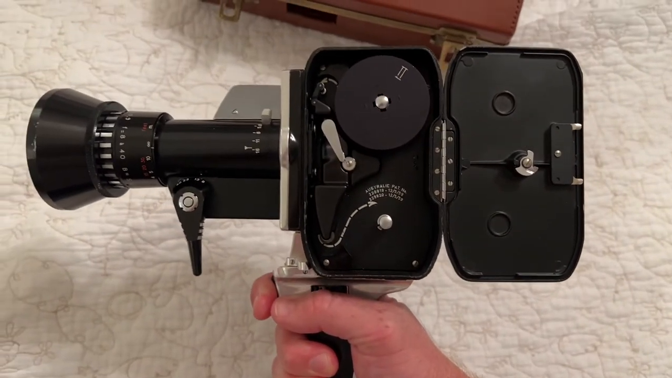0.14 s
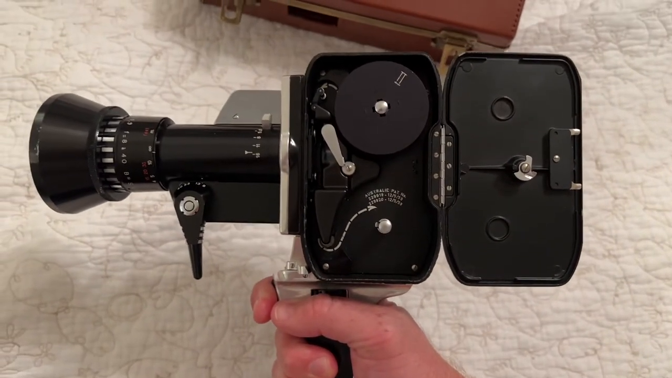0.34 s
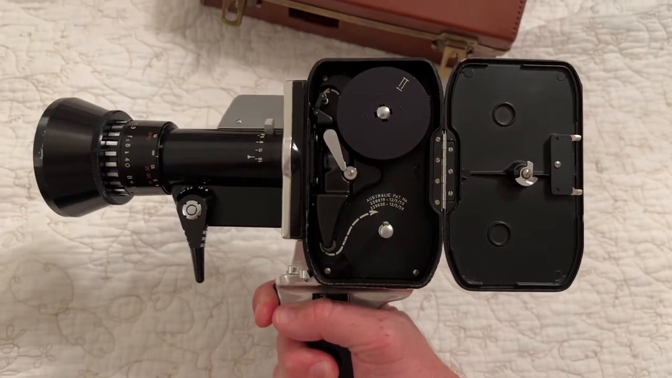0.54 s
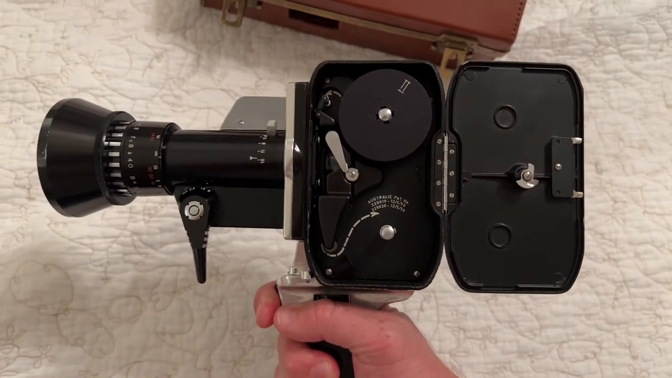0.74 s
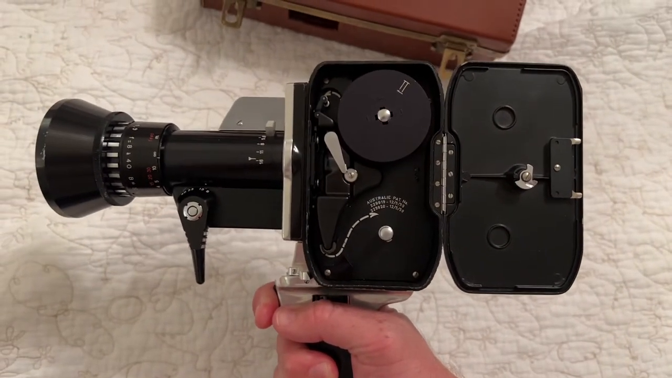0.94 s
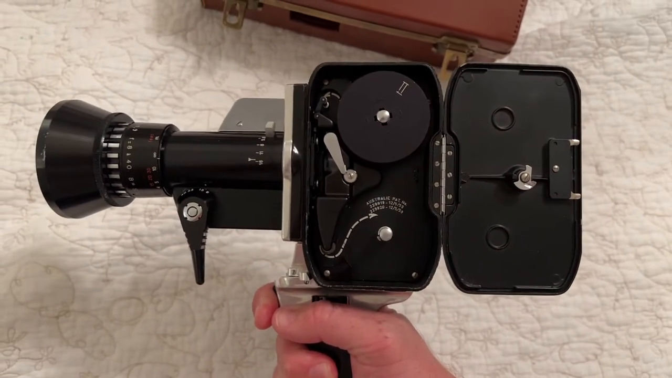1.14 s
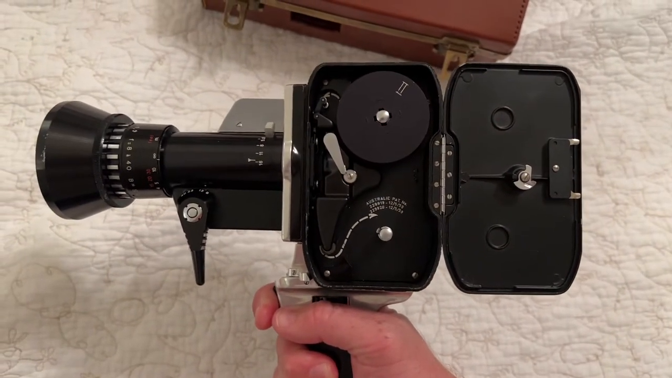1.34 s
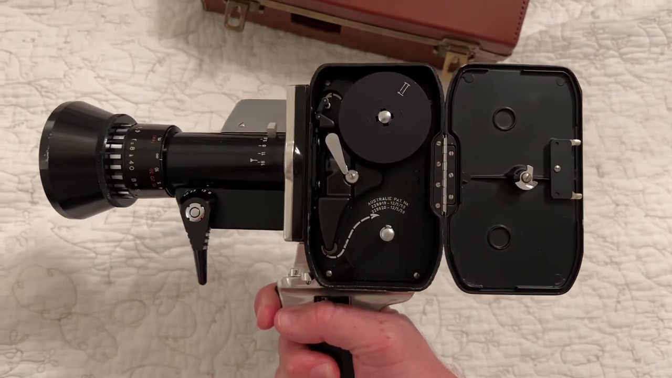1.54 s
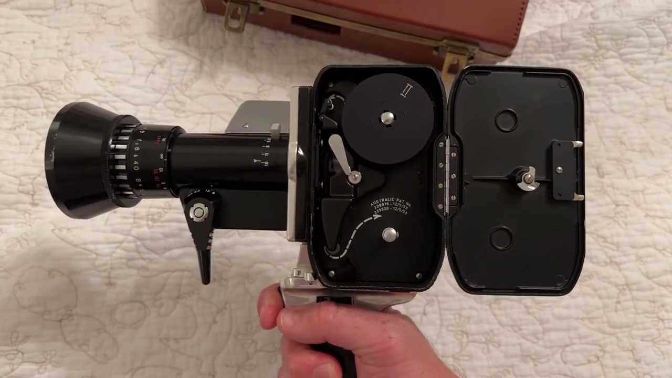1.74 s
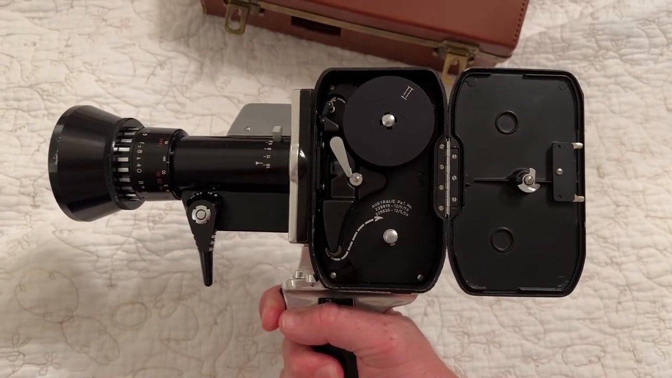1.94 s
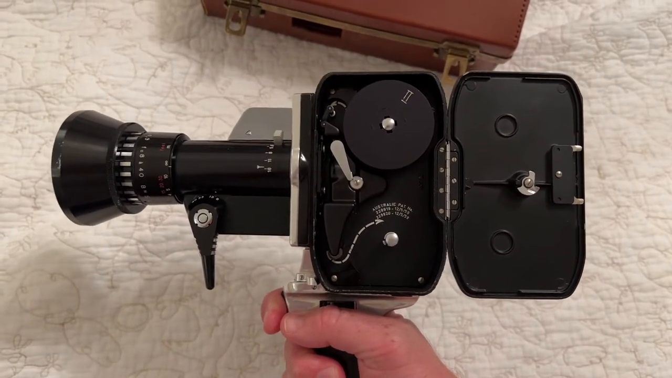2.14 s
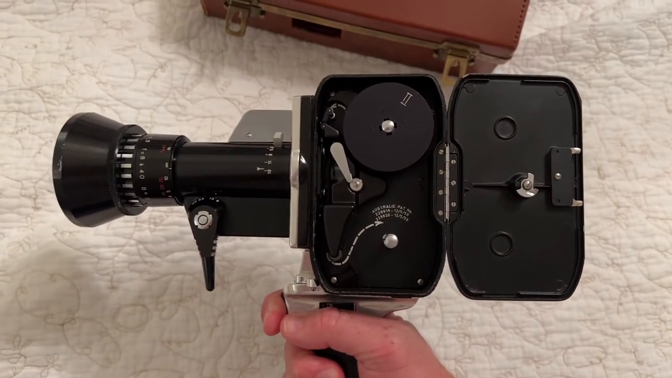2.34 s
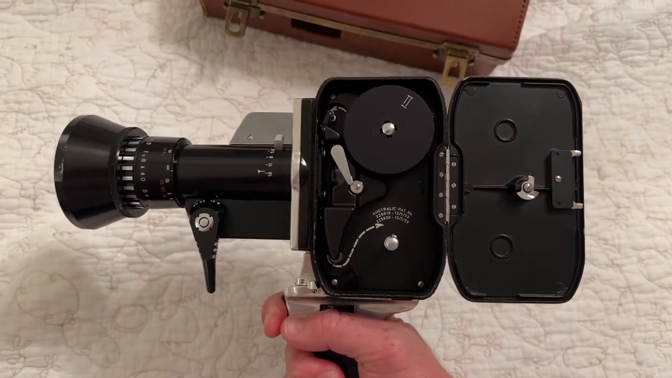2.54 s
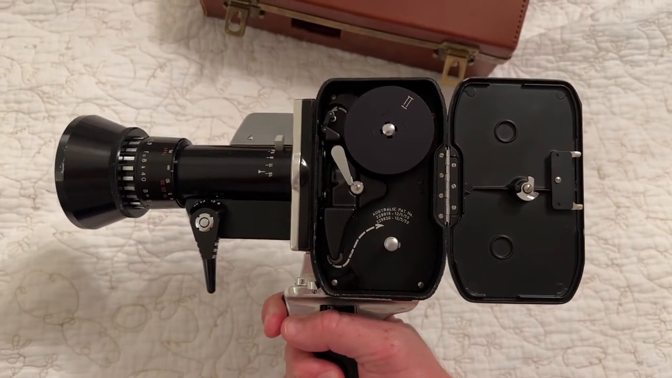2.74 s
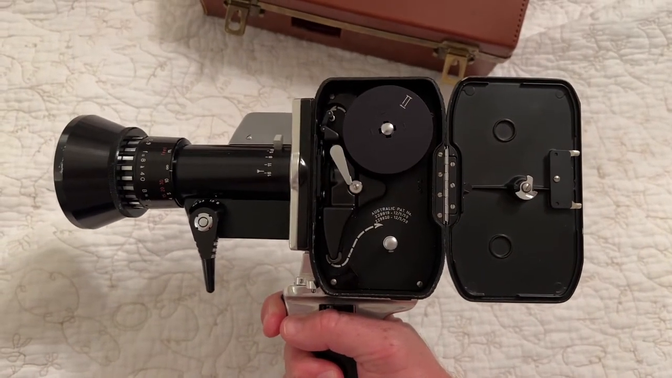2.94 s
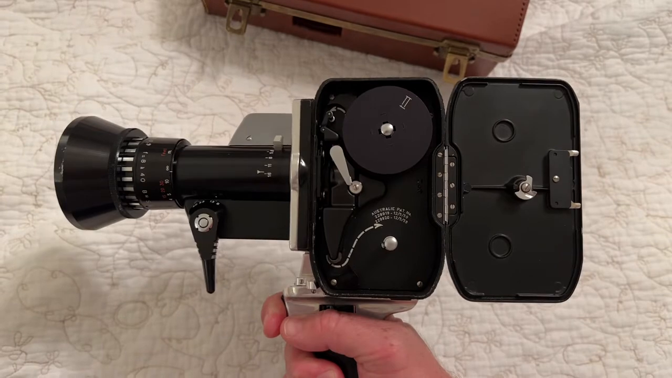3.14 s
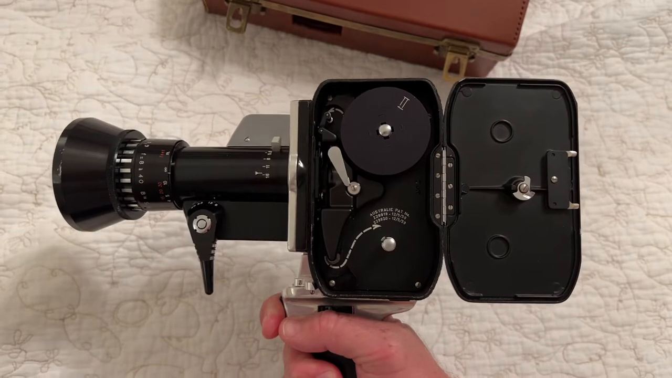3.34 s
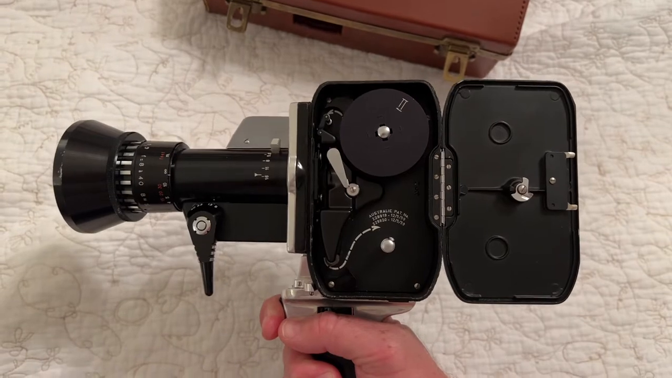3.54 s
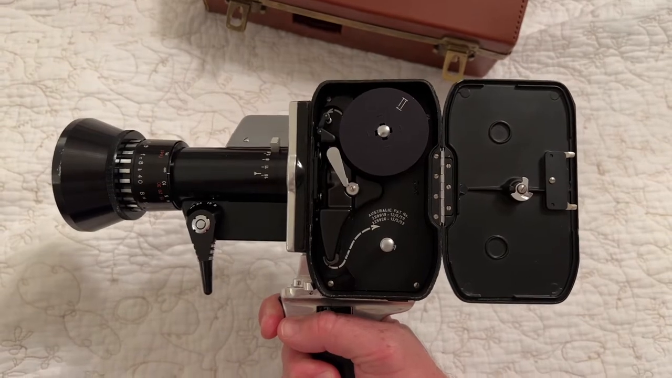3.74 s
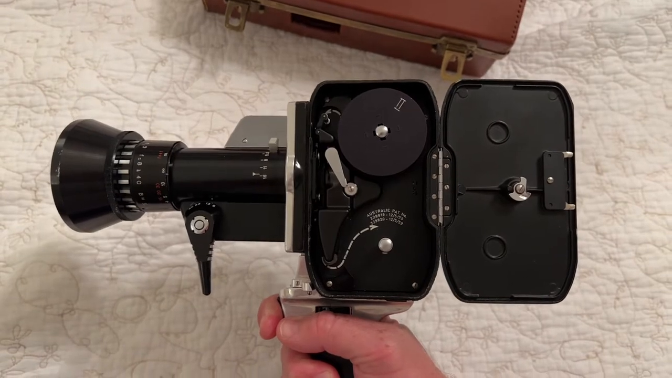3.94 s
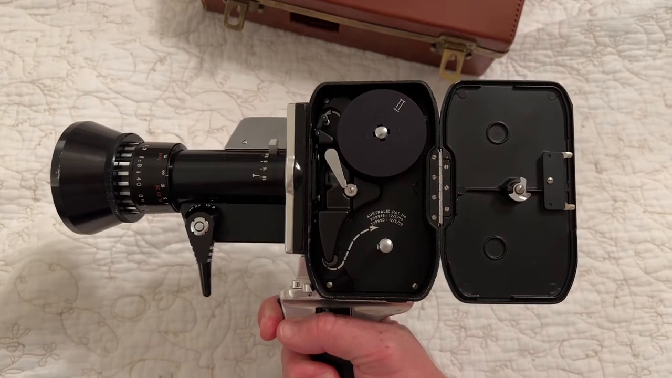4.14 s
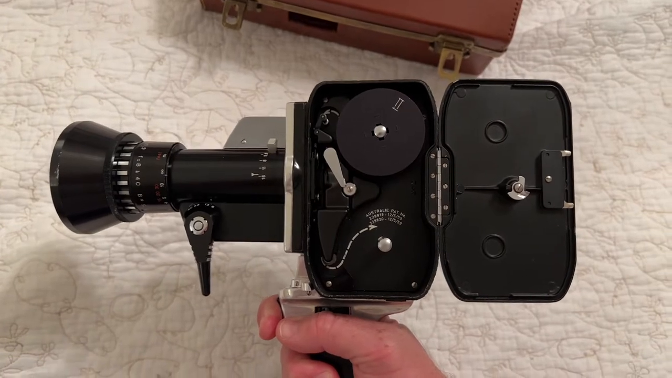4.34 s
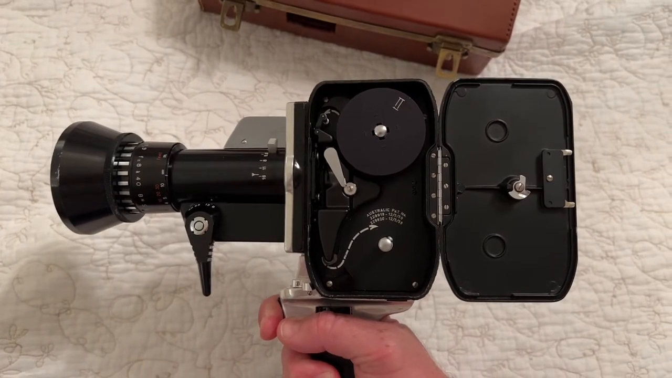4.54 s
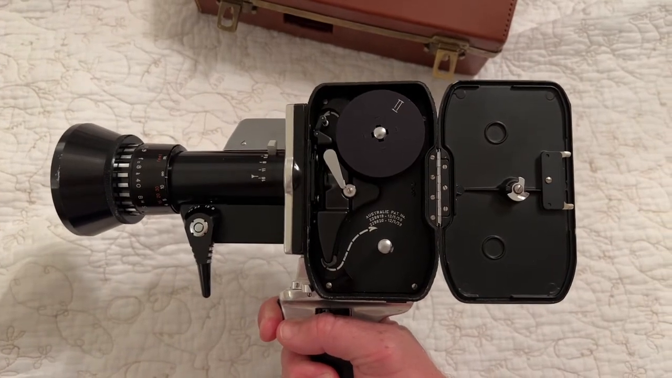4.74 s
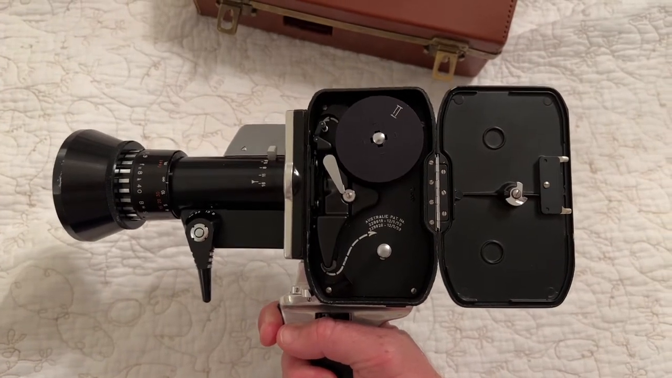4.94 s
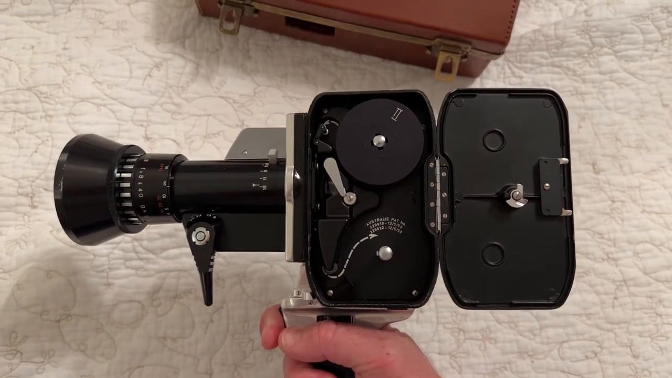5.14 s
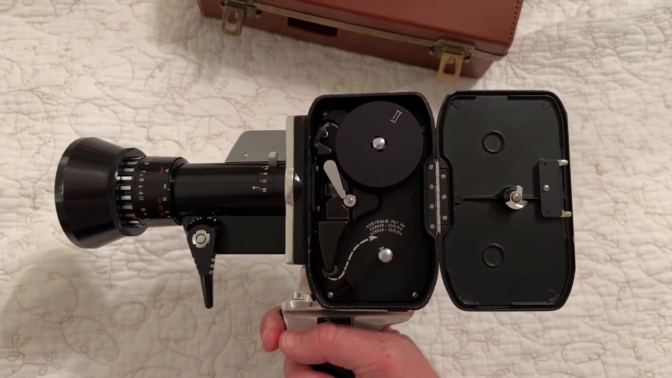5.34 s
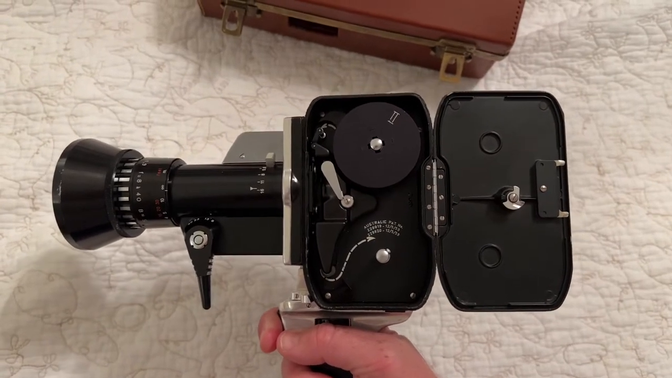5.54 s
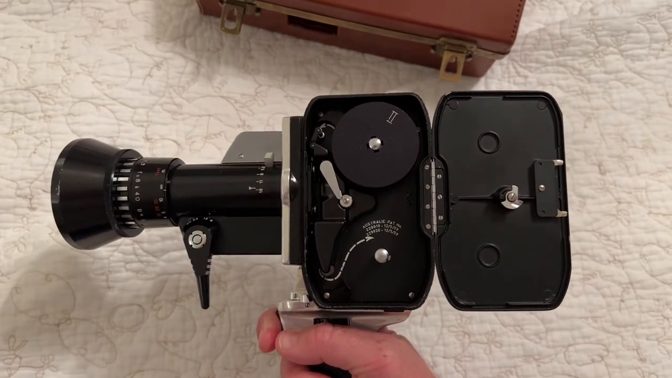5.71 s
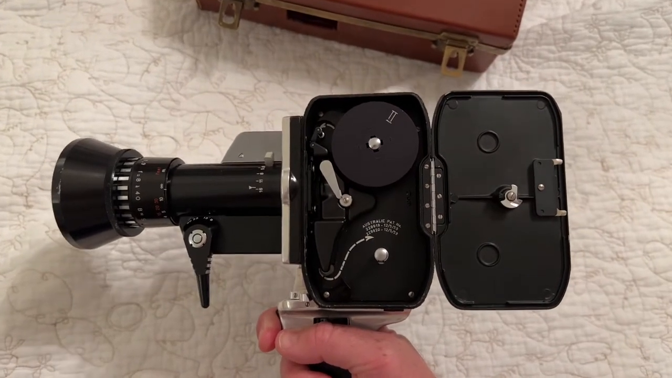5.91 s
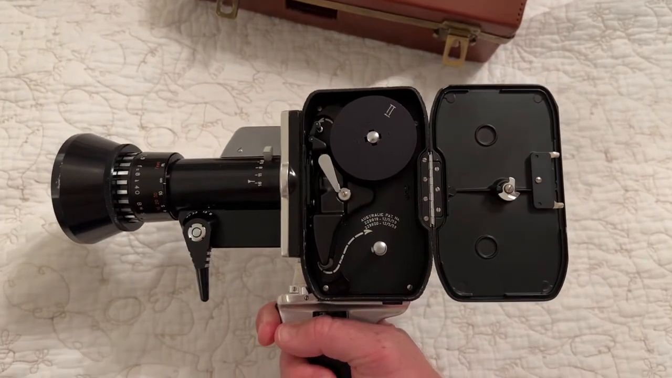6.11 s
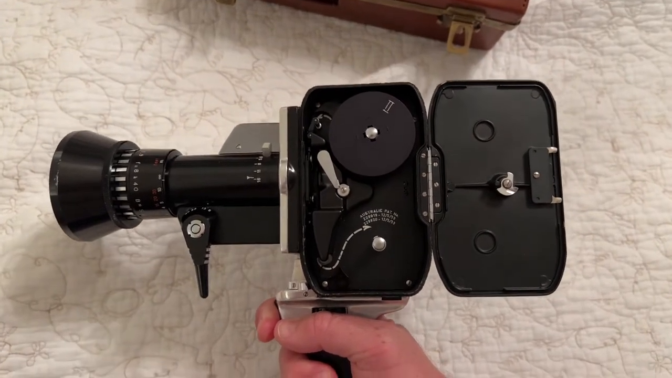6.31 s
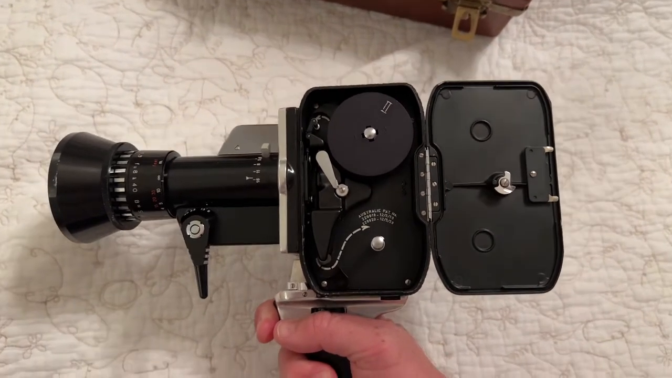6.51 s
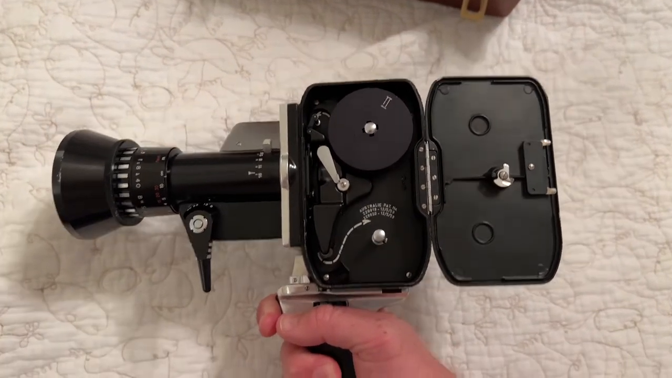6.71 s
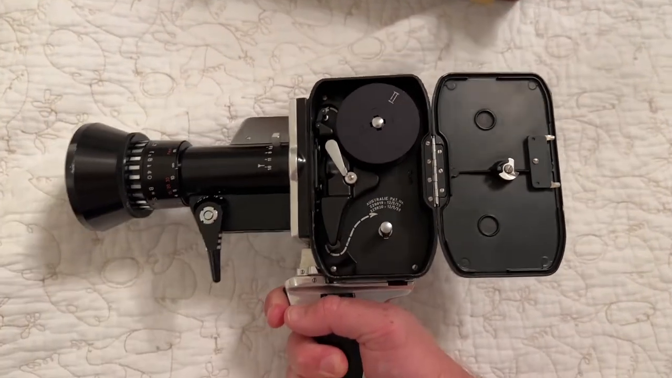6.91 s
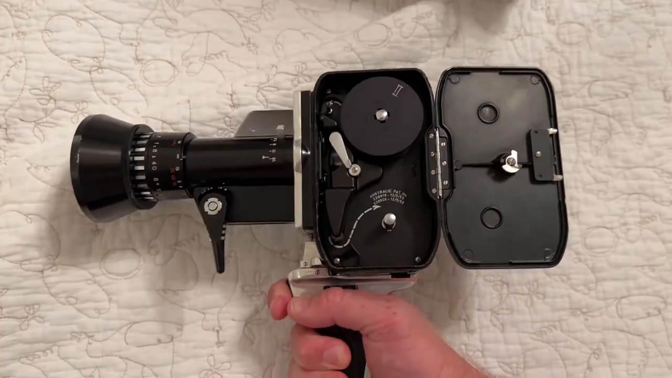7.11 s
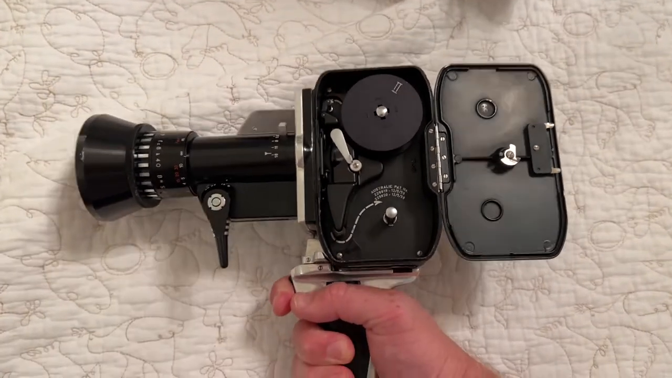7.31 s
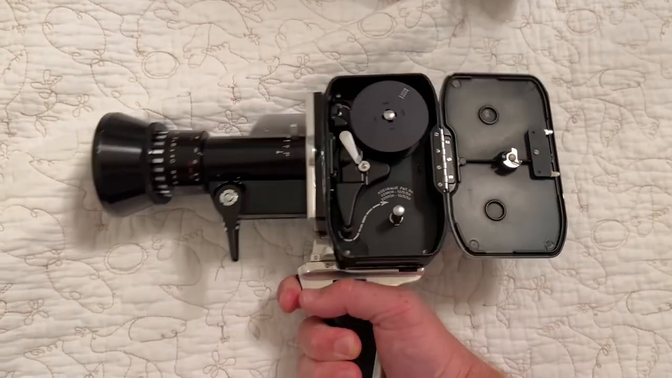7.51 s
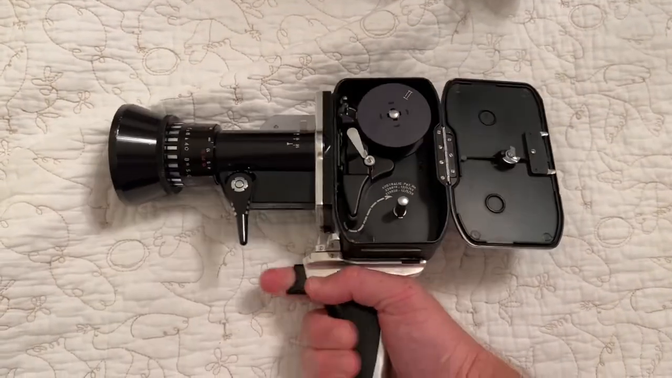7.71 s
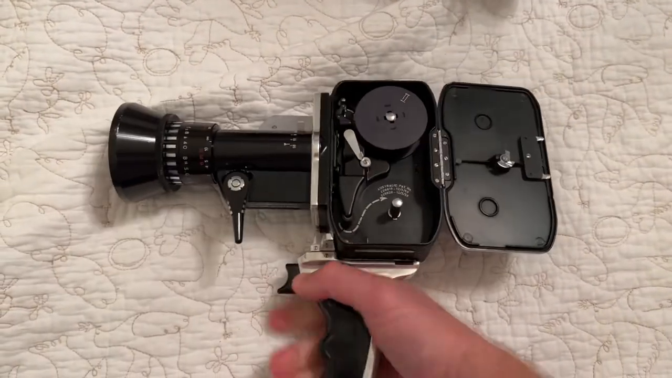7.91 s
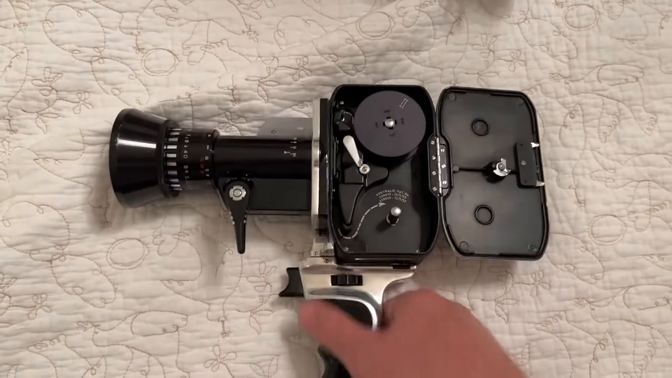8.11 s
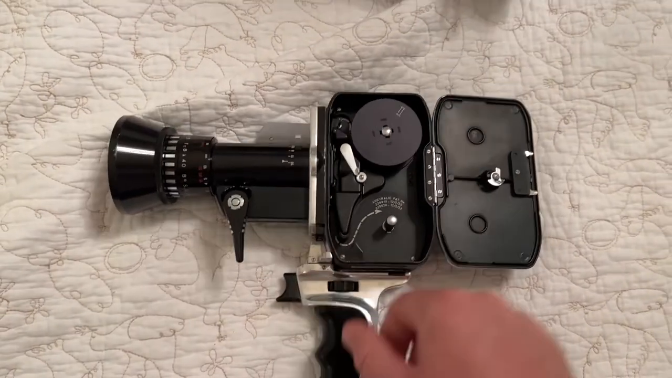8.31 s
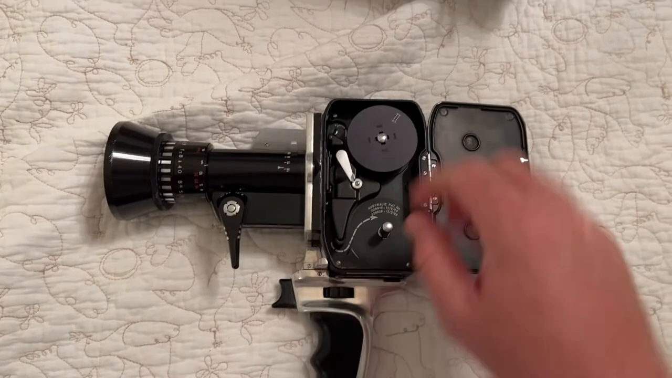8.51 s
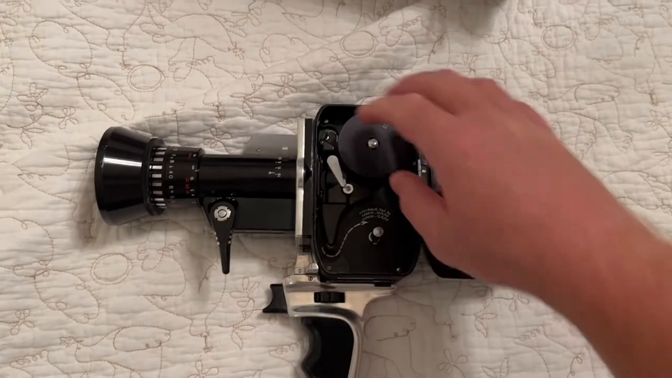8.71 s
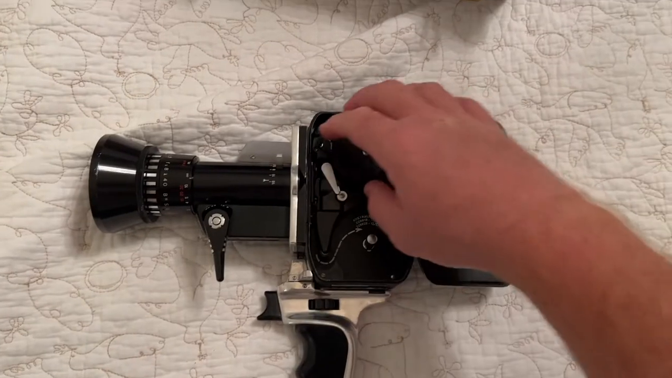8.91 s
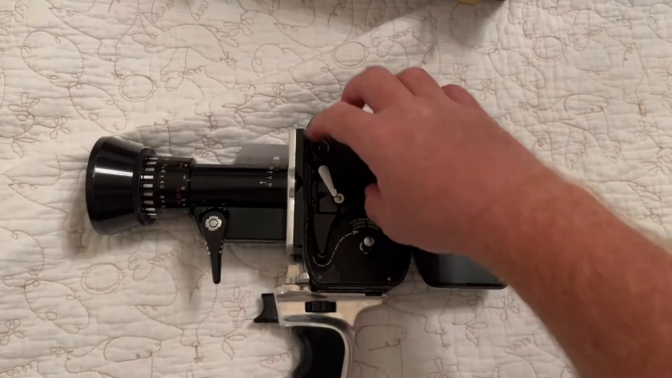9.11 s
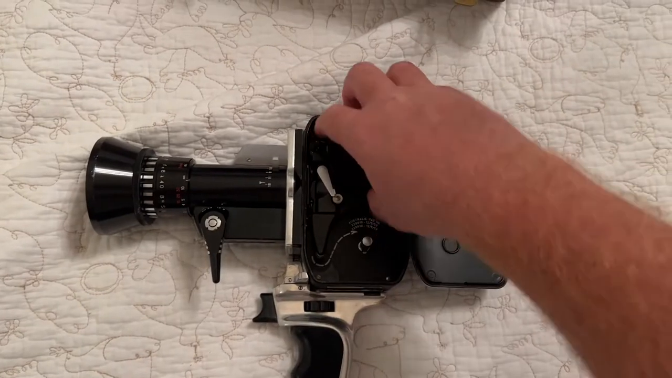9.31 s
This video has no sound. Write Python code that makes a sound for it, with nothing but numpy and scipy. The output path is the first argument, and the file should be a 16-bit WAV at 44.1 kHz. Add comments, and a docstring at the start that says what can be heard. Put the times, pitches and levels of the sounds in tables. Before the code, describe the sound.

Close mechanical whirring from a wind-up film camera ends in a click, followed by light handling and a spool rattling.

```python
"""A spring-driven movie camera runs empty, door open, over a bed in a small room with a faint hum.
Its gears whir through the case and slowly lose speed; near the end the film claw briefly catches.
The quilt rustles, a thin whistle falls away and the stop catches with a clack, ringing the release spring.
The trigger squeaks and clicks back, and the hand slides off the grip.
A fingertip brushes the spool; lifted, it scrapes along its spindle and knocks in its chamber."""
import sys
import numpy as np
from scipy import signal
from scipy.fft import rfft, irfft
from scipy.io import wavfile

SR = 44100
rng = np.random.default_rng(int(sys.argv[2]) if len(sys.argv) > 2 else 0)


def bounce(signal):
    """Save signal as a 16-bit WAV file at the path given by the first command-line argument."""
    frames = np.transpose(np.atleast_2d(signal))
    limited = np.clip(frames, -1, 1)
    pcm = np.round(limited * 32767).astype(np.int16)
    wavfile.write(sys.argv[1], SR, pcm)


N = 417186
TIME = np.arange(N) / SR
STOP_S = 6.872
TEETH_PER_FRAME = 12


def from_db(db):
    """Decibels to gain."""
    return 10 ** (np.asarray(db) / 20)


def rms_one(x):
    """Scale to unit power."""
    return x / np.sqrt(np.mean(x ** 2) + 1e-20)


def between(first, last, share):
    """Linear blend, share 0-1."""
    return first + (last - first) * share


def drift(rate_hz):
    """Smooth random wander, unit power."""
    knots = rng.standard_normal(4000)
    return rms_one(np.interp(TIME * rate_hz, np.arange(len(knots)), knots))


def tone(hz, waver_hz):
    """Unit-power sine of wavering pitch."""
    return np.sqrt(2) * np.sin(2 * np.pi * np.cumsum(hz + waver_hz * drift(300)) / SR)


def swells(strokes):
    """Gain of strokes with Gaussian rise and fall."""
    return sum(from_db(db) * np.exp(-((TIME - peak_s) / np.where(TIME < peak_s, rise_s, fall_s)) ** 2)
               for peak_s, rise_s, fall_s, db in strokes)


def cut(x, hz, kind, order=2):
    """Butterworth low- or high-pass."""
    return signal.sosfilt(signal.butter(order, hz, kind, fs=SR, output="sos"), x + 1e-18)


def split(x, edges_hz):
    """Crossover into bands, low to high."""
    bands = []
    for hz in edges_hz:
        bands.append(cut(cut(x, hz, "low"), hz, "low"))
        x = cut(cut(x, hz, "high"), hz, "high")
    return bands + [x]


def lift(x, hz, width_hz, db):
    """Raise or lower one resonance over time."""
    return x + (from_db(db) - 1) * signal.lfilter(*signal.iirpeak(hz, hz / width_hz, fs=SR), x)


def even(x, softness):
    """Flatten chance peaks and holes in a spectrum."""
    spectrum = rfft(x)
    return irfft(spectrum / (np.abs(spectrum) + softness * np.abs(spectrum).mean()), len(x))


def body(x, slope, modes=(), size=8192):
    """Minimum-phase filter from a slope and resonances; keeps the power of white noise."""
    hz = np.maximum(np.arange(size // 2 + 1) * SR / size, 1)
    slope_hz, slope_db = np.transpose(slope)
    db = np.interp(np.log(hz), np.log(slope_hz), slope_db)
    for centre_hz, width_hz, peak_db in modes:
        db = db + peak_db / (1 + (2 * (hz - centre_hz) / width_hz) ** 2)
    cepstrum = irfft(np.log(from_db(db)))
    cepstrum[1:size // 2] *= 2
    cepstrum[size // 2 + 1:] = 0
    response = irfft(np.exp(rfft(cepstrum)))
    return signal.oaconvolve(x, response / np.linalg.norm(response))[:len(x)]


def room_tone(air_db=-67):
    """Still air: low noise and two hum lines."""
    # air spectrum: (frequency [Hz], gain [dB])
    colour = [(12, -63), (20, -8), (43, -4.5), (98, -8), (138, -11), (168, -14), (285, -15.5), (328, -18.5),
              (472, -17), (718, -25.5), (1570, -25.5), (5680, -35), (7520, -34), (9400, -42), (16000, -40)]
    # hum: (frequency [Hz], level [dB])
    lines = [(50, -89), (111, -78)]
    air = rms_one(cut(body(rng.standard_normal(N), colour), 27, "high", order=4))
    return from_db(air_db) * air + sum(from_db(db) * tone(hz, waver_hz=3.96) for hz, db in lines)


def gear_rattle(frames, jitter_s=0.00007, uneven=0.45, per_frame=260):
    """The same small contacts recur each film frame, varying in timing and force."""
    sizes = even(rng.standard_normal(per_frame), softness=0.1)
    places = np.arange(int(frames[-1]))[:, None] + np.arange(per_frame) / per_frame
    hit_s = np.interp(places, frames, TIME) + jitter_s * rng.standard_normal(places.shape)
    force = sizes * (1 + uneven * rng.standard_normal(places.shape))
    hit_samples = np.clip(hit_s * SR, 0, N - 1).astype(int)
    rattle = rms_one(np.bincount(hit_samples.ravel(), force.ravel(), N))
    return cut(cut(rattle, 3950, "low"), 720, "high", order=4)


def tooth_ticks(teeth, decay_s=0.0026, pattern_db=-2, uneven_db=4, pull_db=0.4):
    """Each tooth scratches as it meshes, some always harder; the claw pulls twice a frame."""
    tooth = teeth.astype(int)
    pattern = rng.permutation(np.linspace(-1, 1, TEETH_PER_FRAME))
    force_db = pattern_db * pattern[tooth % TEETH_PER_FRAME]
    force_db += uneven_db * rng.uniform(-1, 1, N)[tooth]
    force_db -= pull_db * np.cos(2 * np.pi * 2 * tooth / TEETH_PER_FRAME)
    age_s = (teeth % 1) / np.gradient(teeth) / SR
    ticks = rms_one(from_db(force_db) * np.exp(-age_s / decay_s) * rng.standard_normal(N))
    return cut(ticks, 5900, "high", order=1)


def claw(frames, decay_s=0.0045, knock_db=0.5, catch_db=11, catch_at_s=6.226, settle_s=0.16):
    """The film claw strikes the end of its stroke once a frame; for a few frames it catches harder."""
    stroke = (frames - np.interp(catch_at_s, TIME, frames)) % 1
    age_s = stroke / np.gradient(frames) / SR
    catch = (TIME >= catch_at_s) * np.exp(-((TIME - catch_at_s) / settle_s) ** 2)
    force = between(from_db(knock_db), from_db(catch_db), catch)
    return force * np.exp(-age_s / decay_s) * cut(rng.standard_normal(N), 3000, "low", order=1)


def train_load(frames):
    """Gain of the whir as the shutter cam and out-of-true wheels load the train."""
    # cam beats: (place in frame [0-1], length [frames], gain [dB])
    beats = [(.01, .045, 2.6), (.19, .04, 1.4), (.56, .06, 1.2)]
    # wheel throb: (rate [turns/frame], depth [dB])
    throbs = [(2.73, .6), (3.08, .8), (11, .8)]
    cam_db = sum(db * np.exp(-(((frames - place + 0.5) % 1 - 0.5) / length) ** 2)
                 for place, length, db in beats)
    throb_db = sum(db * np.cos(2 * np.pi * turns * frames) for turns, db in throbs)
    return rms_one(from_db(cam_db + throb_db))


def small_parts(force, t60_s=0.022, ring_db=-7.5):
    """Wheels, pins and plates add a short metallic hiss to each jolt."""
    retained = from_db(-60 / (t60_s * SR)) ** 2
    energy = signal.lfilter([1 - retained], [1, -retained], force ** 2)
    return force + from_db(ring_db) * np.sqrt(energy) * cut(rng.standard_normal(N), 2200, "high")


def camera_case(force, spent, tight):
    """The ring moves from side panel to film chamber as the spring unwinds; tight mesh damps the chamber."""
    # case response: (frequency [Hz], gain [dB])
    slope = [(200, -37.5), (350, -26), (480, -22.5), (720, -17.5), (900, -9.5), (1400, -11.5),
             (2200, -19.5), (4000, -20), (6500, -29), (9000, -37), (11000, -37), (14900, -35.5),
             (15700, -54)]
    # steady resonances: (frequency [Hz], width [Hz], gain [dB])
    modes = [(635, 25, 0.5), (1000, 122, 3.5), (1115, 52, 3.5), (1188, 20, -4.5), (1302, 103, 6.5),
             (1440, 35, 4.5), (1523, 48, 4.5), (1710, 76, -3), (1887, 290, 6.5), (2084, 77, -10),
             (2390, 1250, 4), (3088, 214, 4.5), (4020, 310, 7.5), (4260, 87, -6.5), (4545, 160, 5),
             (4940, 94, 5.5), (3600, 310, -0.5), (5720, 310, 4.5), (7080, 350, 8), (7690, 1140, 7),
             (13400, 640, 4.5)]
    # shifting resonances: (frequency [Hz], width [Hz], wound [dB], halfway [dB], spent [dB])
    shifting_modes = [(2020, 530, 0, -1, -1.5), (2900, 210, -1.5, 0, -7), (4020, 390, -3, -1, -2),
                      (5900, 340, 2, 3, 5.5), (7340, 300, -2, 0, 0.5), (8000, 450, 2, 0, -4),
                      (13400, 1000, 5.5, 3.5, 3.5)]
    chamber_db = between(1.5, -4.5, tight) + 8.5 * spent
    panel_db = between(2.5, -3, spent)
    whir = rms_one(body(force, slope, modes))
    whir = lift(whir, hz=1086, width_hz=46, db=chamber_db)
    whir = lift(whir, hz=1295, width_hz=130, db=panel_db)
    for hz, width_hz, *stages_db in shifting_modes:
        whir = lift(whir, hz, width_hz, np.interp(TIME, [0, STOP_S / 2, STOP_S], stages_db))
    return whir


def gear_tones(frames, orders, flutter_rad, waver_db):
    """Lines locked to the frame rate; play in the gears shakes their level and phase."""
    out = np.zeros(N)
    for cycles, db in orders:
        gain = from_db(db + waver_db * drift(5))
        phase = 2 * np.pi * (cycles * frames + rng.random()) + flutter_rad * drift(10)
        out += gain * np.sqrt(2) * np.sin(phase)
    return out


def motor(wound_teeth_hz=203.1, sag_hz=5, wheel_turn_s=3.07, loosest_at_s=0.023):
    """The spring drives a slowing gear train, which whirs, hums and whines until the stop."""
    # one gear's hum and side tones: (order [cycles/frame], gain [dB])
    hum_orders = [(33, -7), (34, -2.5), (35, -7), (36, -14)]
    # whine of the faster gears: (order [cycles/frame], gain [dB])
    whine_orders = [(50, -3), (54, -2), (60, 2), (61, -1), (64, 1), (66, -2), (67, -1), (75, 2), (76, 3),
                    (77, 2), (78, 2), (91, -3), (108, -4), (110, -6)]
    spent = np.minimum(TIME / STOP_S, 1) ** 2  # the spring weakens ever faster
    # a slow, out-of-true wheel tightens the mesh once a turn
    tight = np.abs(np.sin(np.pi * (TIME - loosest_at_s) / wheel_turn_s)) ** 0.75
    teeth = np.cumsum(wound_teeth_hz - sag_hz * spent) / SR
    frames = teeth / TEETH_PER_FRAME
    governor_friction = from_db(-4.5) * rng.standard_normal(N)
    gears = cut(gear_rattle(frames) + governor_friction + claw(frames), 4650, "low", order=1)
    force = train_load(frames) * (gears + from_db(2) * tooth_ticks(teeth))
    whir = from_db(-44) * camera_case(small_parts(force), spent, tight)
    hum_db = between(-69, -61.5, tight) - 0.5 * spent
    hum = from_db(hum_db) * gear_tones(frames, hum_orders, flutter_rad=0.18, waver_db=0.4)
    whine = from_db(-64) * gear_tones(frames, whine_orders, flutter_rad=0.55, waver_db=3.5)
    running = np.exp(-np.maximum(TIME - STOP_S, 0) / 0.0065)
    return (whir + hum + whine) * running


def rub(strokes, colour, grain_db):
    """Sliding contact: dense, uneven micro-slips under each stroke."""
    slips = rng.standard_normal(N) * from_db(grain_db * drift(400))
    return swells(strokes) * rms_one(body(slips, colour))


def quilt():
    """Cloth rustles as the camera is lowered, then let go."""
    # rustles: (peak [s], rise [s], fall [s], level [dB])
    strokes = [(6.97, 0.37, 0.22, -66), (8.0, 0.32, 0.16, -67.5)]
    # cloth spectrum: (frequency [Hz], gain [dB])
    colour = [(20, -22), (55, 0.5), (150, -24), (330, -6), (700, -14.5), (2000, -20), (6000, -38),
              (16000, -57)]
    return rub(strokes, colour, grain_db=6)


def whistle(top_hz=15100, drop_hz=1350, drop_at_s=7.0, doubling_s=0.08):
    """A thin whistle around the stop, falling ever faster."""
    # swells: (peak [s], rise [s], fall [s], level [dB])
    strokes = [(6.8, .1, .05, -79), (7.01, .12, .085, -83.5)]
    hz = np.maximum(top_hz - drop_hz * 2 ** ((TIME - drop_at_s) / doubling_s), 0)
    return swells(strokes) * from_db(3 * drift(90)) * tone(hz, waver_hz=70)


def contacts(hits, slope, modes, crunch_s, crack, size=4096):
    """A crack and short crunch ring a part; the spot struck favours one pitch and damps another."""
    # band edges: (body to ring [Hz], ring to snap [Hz])
    edges_hz = [2200, 7000]
    out = np.zeros(N + size)
    age_s = np.arange(size) / SR
    attack = age_s < 0.008
    touching = np.exp(-(age_s / 0.014) ** 2)
    pressure = crack * np.exp(-age_s / 0.0004) + np.exp(-age_s / crunch_s)
    for time_s, *bands_db, favoured_hz, damped_hz, contrast_db in hits:
        force = touching * even(rng.standard_normal(size) * pressure, softness=0.4)
        spot = [(favoured_hz, 0.2 * favoured_hz, contrast_db), (damped_hz, 0.35 * damped_hz, -contrast_db)]
        knock = body(force, slope, list(modes) + spot)
        start = int(time_s * SR)
        for band, db in zip(split(knock, edges_hz), bands_db):
            out[start:start + size] += from_db(db) * band / np.std(band[attack])
    return out[:N]


def latch():
    """The stop clacks home; trigger and grip click after it."""
    # contacts: (time [s], body gain [dB], ring gain [dB], snap gain [dB],
    # favoured [Hz], damped [Hz], contrast [dB])
    hits = [(6.8658, -44, -43, -36.5, 13900, 5300, 6), (6.8688, -39, -49, -38, 3900, 1380, 4),
            (6.8738, -36.5, -36.5, -41, 4700, 2850, 4), (6.8801, -39, -47, -50, 1590, 5400, 3),
            (6.8879, -37, -53, -66, 860, 1820, 7), (6.8945, -64, -48, -62, 980, 3350, 12),
            (6.961, -70, -61, -65, 860, 4710, 7), (6.991, -65, -57, -86, 1900, 6500, 7),
            (7.0005, -70, -59, -67, 7590, 4400, 5), (7.012, -72, -65, -73, 1940, 4400, 7),
            (7.5935, -67, -43.5, -66, 3060, 7090, 7), (7.5952, -72, -51, -42.5, 3570, 7140, 18),
            (7.604, -53, -45, -56, 5040, 4110, 6), (7.619, -59, -59, -59, 1290, 980, 10),
            (7.6862, -52, -47.5, -47, 6190, 860, 7), (7.7174, -51, -55, -44, 3170, 980, 11),
            (7.7213, -53, -45, -56, 9970, 7090, 7), (8.233, -61, -62, -70, 2230, 6620, 12),
            (8.238, -74, -62, -76, 4400, 7000, 9), (8.254, -69, -75, -90, 1350, 4400, 13)]
    # latch response: (frequency [Hz], gain [dB])
    slope = [(150, -4), (550, -8), (950, 8), (2200, 8), (4500, 4), (8000, -10.5), (10000, -16.5),
             (13000, -17), (16000, -20)]
    # resonances: (frequency [Hz], width [Hz], gain [dB])
    modes = [(1020, 880, 8.1), (1430, 160, 3.6), (1770, 66, 3.1), (3540, 310, 2.7), (3960, 98, 4.3),
             (7100, 570, 4.5), (11600, 900, 4.4), (13200, 700, 5.5)]
    return from_db(-3) * contacts(hits, slope, modes, crunch_s=0.0024, crack=1.1)


def release_spring():
    """Rings when the stop catches, squeaks as the trigger is eased back."""
    # spring modes: (frequency [Hz], squeak gain [dB], struck level [dB], t60 [s])
    modes = [(1795, -4, -68, .8), (2710, -16, -72, .8), (4199, 1, -62.5, .38), (7548, 1.5, -72, .5),
             (11606, -12, -90, .3), (14443, -15, -92, .3)]
    # squeaks: (peak [s], rise [s], fall [s], level [dB])
    strokes = [(7.24, .04, .04, -90), (7.335, .03, .03, -85), (7.395, .02, .02, -85),
               (7.465, .025, .03, -81), (7.545, .03, .03, -79.5)]
    easing = swells(strokes)
    out = np.zeros(N)
    for hz, squeak_db, struck_db, t60_s in modes:
        struck = (TIME > STOP_S) * from_db(struck_db - 60 * np.abs(TIME - STOP_S) / t60_s)
        squeak = easing * from_db(squeak_db + 3.5 * drift(55))
        out += (struck + squeak) * tone(hz, waver_hz=30)
    return out


def hand():
    """Skin slides on trigger and grip."""
    # slides: (peak [s], rise [s], fall [s], level [dB])
    strokes = [(7.61, 0.073, 0.042, -65), (7.95, 0.17, 0.16, -56.5), (8.17, .06, 0.05, -67.5),
               (9.08, .03, .04, -70)]
    # skin spectrum: (frequency [Hz], gain [dB])
    colour = [(150, -30), (250, -10), (421, -6), (460, -9), (557, -7), (597, -11), (735, -9.5),
              (1280, -4.5), (3120, -5), (7980, -23.5), (16000, -32)]
    return rub(strokes, colour, grain_db=0.5)


def fingertip():
    """A fingertip brushes the spool."""
    # brush: (peak [s], rise [s], fall [s], level [dB])
    strokes = [(8.888, 0.013, 0.026, -68)]
    # brush spectrum: (frequency [Hz], gain [dB])
    colour = [(500, -30), (2700, -12), (3400, 5), (4100, -16), (9000, -35)]
    return rub(strokes, colour, grain_db=-1)


def spool():
    """The lifted spool knocks on spindle and chamber and scrapes along the spindle."""
    # contacts: (time [s], body gain [dB], ring gain [dB], snap gain [dB],
    # favoured [Hz], damped [Hz], contrast [dB])
    hits = [(9.054, -58, -62, -85, 3380, 1290, 12), (9.108, -56, -52, -73, 6620, 4400, 15),
            (9.1143, -63, -32, -42, 2650, 4180, 8), (9.1565, -38, -33, -56, 7590, 1130, 4),
            (9.1602, -30, -20, -29, 4520, 2340, 5), (9.165, -34, -47, -39, 12280, 2230, 5),
            (9.173, -48, -47, -51, 7090, 1380, 13), (9.217, -47, -53, -45, 13500, 1500, 7),
            (9.2205, -41, -58, -68, 4200, 1940, 11), (9.2428, -43, -44.5, -49, 12280, 9310, 18),
            (9.2663, -45, -45, -72, 4400, 2930, 6), (9.3198, -44, -44, -49, 12280, 1380, 15),
            (9.3232, -37, -41.5, -49, 1140, 1600, 9), (9.3418, -44, -40, -46, 3720, 1700, 12),
            (9.3826, -42.5, -54, -64, 2000, 1400, 2), (9.3906, -45, -51, -82, 1900, 1400, 8),
            (9.408, -40, -65, -72, 1600, 2230, 3), (9.4126, -50, -46, -41, 12280, 1500, 7),
            (9.4145, -39, -33, -46, 3700, 1400, 10)]
    # spool response: (frequency [Hz], gain [dB])
    slope = [(150, -30), (330, -3.5), (550, -2.5), (750, -8), (1100, -4), (2500, -5), (4800, -13),
             (7500, -28), (11000, -28.5), (16000, -26.5)]
    # resonances: (frequency [Hz], width [Hz], gain [dB])
    modes = [(1060, 120, 11), (1323, 170, 11), (1516, 240, 18), (2020, 330, 10), (2800, 180, 5.6),
             (3450, 180, 4.2), (4160, 470, 6.1), (4740, 460, 5.8), (6000, 230, 8.9), (9900, 580, 8.3),
             (12100, 530, 10), (13600, 550, 6)]
    # scrapes: (peak [s], rise [s], fall [s], level [dB])
    strokes = [(9.135, 0.021, 0.017, -60), (9.19, .02, 0.025, -54.5), (9.26, .018, 0.026, -54),
               (9.33, 0.012, .025, -59), (9.44, 0.012, .05, -50.5)]
    # scrape spectrum: (frequency [Hz], gain [dB])
    colour = [(150, -14), (420, -2.5), (720, -14), (1050, 4), (1350, 2), (1900, -1), (2800, -9),
              (4200, -18), (5500, -20), (7500, -35), (12500, -23), (16000, -28)]
    knocks = from_db(-7) * contacts(hits, slope, modes, crunch_s=0.0023, crack=0.28)
    return knocks + rub(strokes, colour, grain_db=1)


def reverb(x, t60_s=0.44, build_s=0.0084, wet_db=-18.5, size=32768):
    """Diffuse tail that builds as the sound reaches the walls."""
    # room response: (frequency [Hz], gain [dB])
    colour = [(150, -4.5), (500, 6), (1000, -4.5), (1800, -2), (3800, -2), (5500, -10), (9000, -1),
              (12000, -10), (15000, -12)]
    age_s = np.arange(size) / SR
    envelope = from_db(-60 * age_s / t60_s) * np.clip(age_s / build_s, 0, 1) ** 2
    tail = envelope * rng.standard_normal(size)
    tail = body(tail / np.linalg.norm(tail), colour)
    return from_db(wet_db) * signal.oaconvolve(x, tail)[:N]


def scene():
    """Camera and hands up close in a quiet room; mono."""
    near = motor() + quilt() + whistle() + latch() + release_spring() + hand() + fingertip() + spool()
    return (room_tone() + near + reverb(near))[None]


def record(dry):
    """Steep elliptic low-pass."""
    cutoff_hz = 15750
    return signal.sosfilt(signal.ellip(10, 0.2, 80, cutoff_hz, fs=SR, output="sos"), dry)


dry = scene()
out = record(dry)
bounce(out)
```